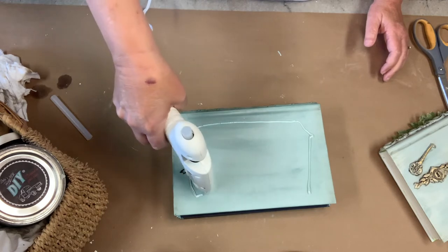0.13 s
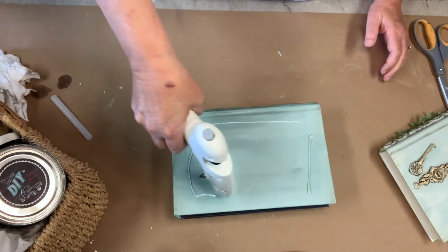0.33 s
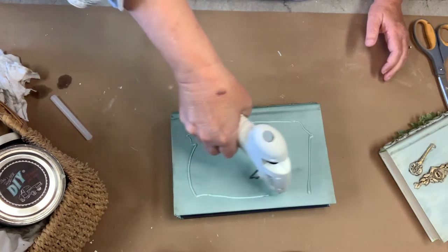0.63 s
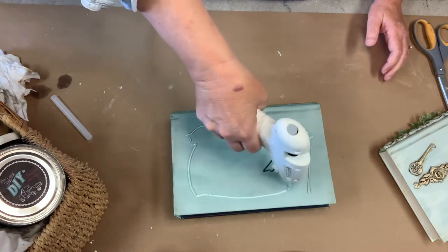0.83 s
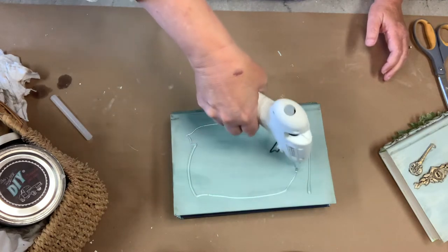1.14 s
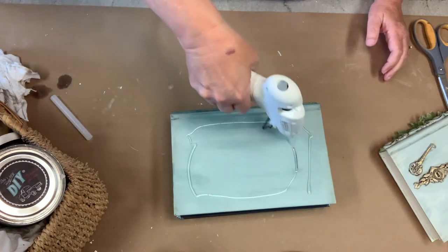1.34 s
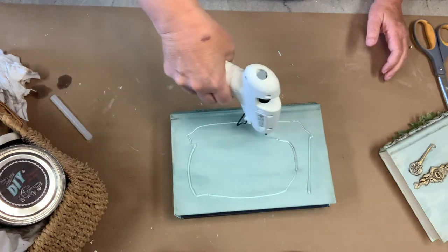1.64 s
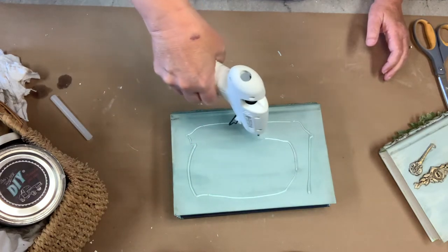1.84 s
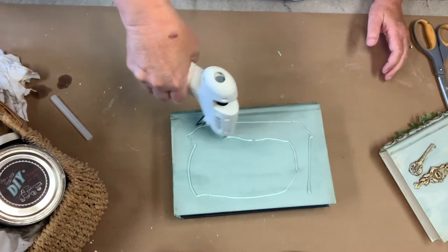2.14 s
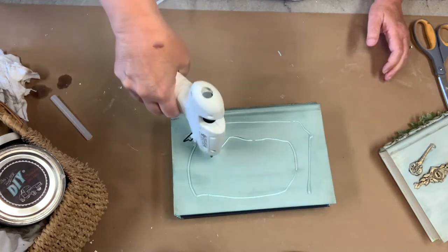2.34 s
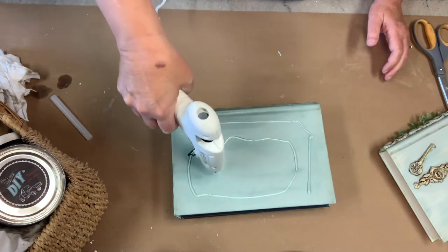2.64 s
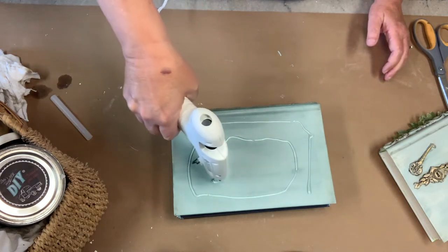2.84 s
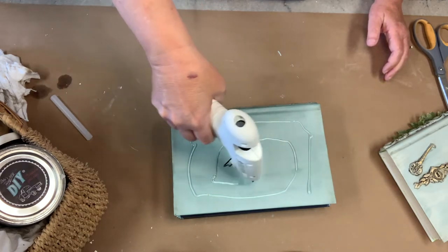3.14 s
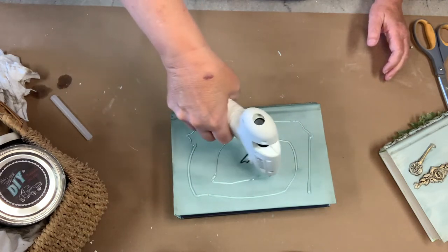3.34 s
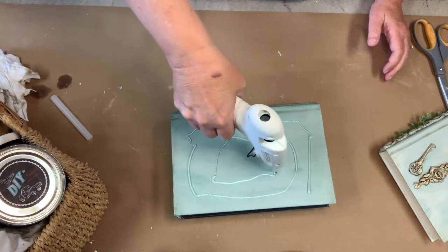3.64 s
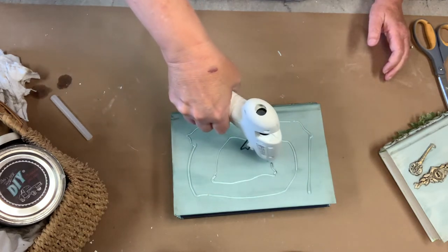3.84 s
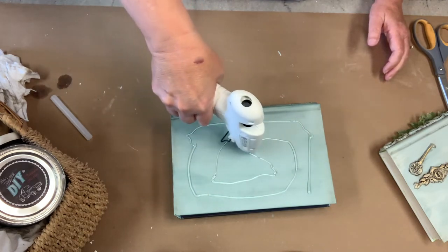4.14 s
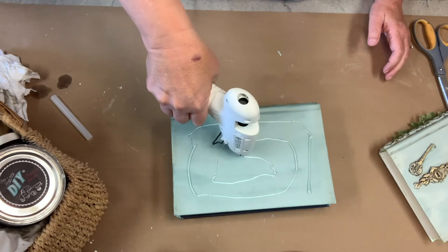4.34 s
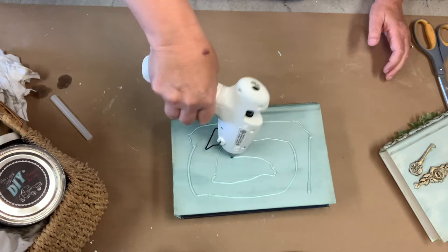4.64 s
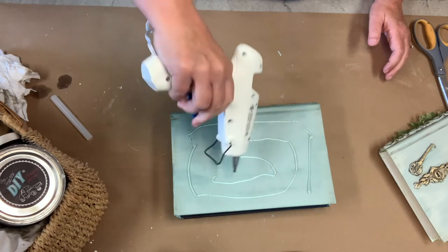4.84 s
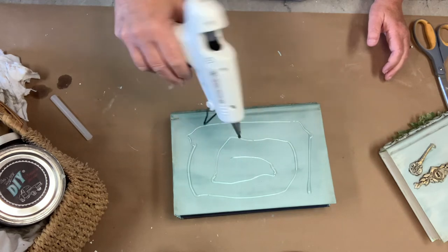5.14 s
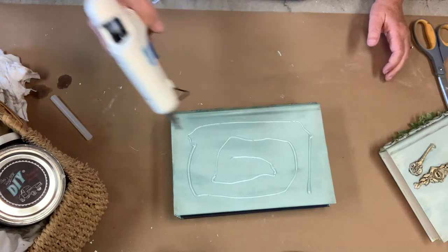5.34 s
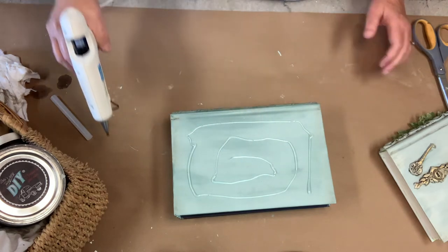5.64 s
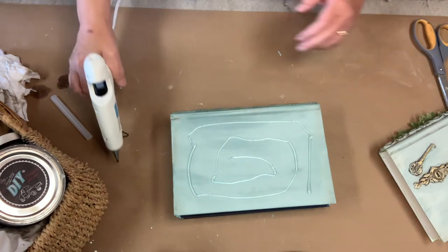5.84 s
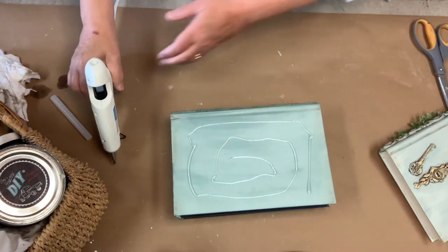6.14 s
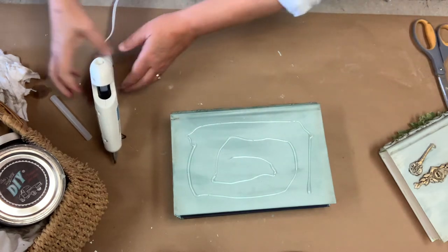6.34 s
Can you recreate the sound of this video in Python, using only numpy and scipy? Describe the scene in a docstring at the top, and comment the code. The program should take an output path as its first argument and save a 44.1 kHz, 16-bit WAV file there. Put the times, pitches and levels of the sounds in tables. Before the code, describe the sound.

A low, steady electrical hum with a slow waver and soft air noise runs throughout, in a small quiet room heard closely in stereo. Faint skin and sleeve rustles open the scene, with weak ticks from 0.1 to 0.6 seconds. Clearer hollow plastic trigger clicks with short dry creaks cluster at 0.7-0.9, 1.4-1.7, 2.2-2.5 and 3.0-3.3 seconds. More clicks, mostly without creaking, come at 3.7-4.0, a few scattered ones follow, and a last clicking, creaking burst runs from 4.6 to 4.8. Then mostly hum and light rustling. At about 5.87 the wire stand taps the table, and at 5.89 the grip strikes: a sharp, loud clack with a brief woody boom. The plastic rattles quickly, fading by 6.1, while the table ring is abruptly damped near 5.97 with a soft low bump. A slightly stronger rustle at 6.03 and tiny ticks finish over the hum.

```python
"""Quiet room, a plastic glue gun close to two microphone ports: hum at twice the mains frequency, air noise throughout.
The trigger ticks and creaks in bursts, each contact ringing the hollow shell; sleeve and skin rustle now and then.
Near six seconds the gun is set down: wire stand first, then the grip strikes, the table top booms, the gun rattles.
A soft bump and a few last ticks follow. Modes are damped sines, rubbing is random grains or slips, the walls add
a noise tail, and the ports hear everything a little out of step."""
import sys
import numpy as np
from scipy import signal
from scipy.fft import rfft, irfft, next_fast_len
from scipy.io import wavfile
from scipy.ndimage import uniform_filter1d, map_coordinates

SR = 44100
rng = np.random.default_rng(int(sys.argv[2]) if len(sys.argv) > 2 else 0)


def store_pcm(level_fs):
    """Save levels as 16-bit WAV."""
    pcm = np.round(np.clip(level_fs, -1, 1) * 32767).astype(np.int16)
    wavfile.write(sys.argv[1], SR, np.atleast_2d(pcm).T)


N = 286209  # samples

# Trigger contacts, close by: start_s, shell_peak_db, then hollow_db and grip_db over that peak, hardness_db
TICKS = [(0.139, -59, -9, -5, -15), (.232, -60.5, 9.5, -7, -12), (0.326, -52.5, -12, 3.5, -18),
         (.3744, -54.5, -2, 6.5, 6), (0.3873, -55.5, -9, 2, 23.5), (0.4677, -56, -14, 4.5, -7),
         (0.612, -53.5, 3, -18, -27), (.6964, -44.5, -5, -8, 12), (.6998, -38.5, 4, -29, -4),
         (0.7669, -40, -17, 0.5, 1), (0.7817, -41, -4, 1, 2.5), (0.7871, -47.5, -20, 3.5, -10),
         (0.7962, -38, -13, -16, -9), (0.801, -57, -9, -4, -2), (.8739, -40.5, -0.5, -22, -12),
         (0.9016, -46.5, 0.5, -6, -3), (1.3933, -45.5, 1.5, -16, -8), (1.4016, -39, -0.5, -20, 2.5),
         (1.4094, -53, -3, 7.5, 18), (1.499, -40.5, -16, -2, 9), (1.5079, -48.5, -3, 6, 3.5),
         (1.5138, -39, -5.5, -2, -0.5), (1.521, -46.5, -1, -6, -6), (1.577, -53, -20, -11, -19),
         (1.5836, -39.5, -28, -15.5, -39), (1.6234, -57, 6, -9, -6), (1.6734, -46, 0, 1, 8.5),
         (2.1745, -50.5, 8, -1, -7), (2.1824, -48, -6, 0, 15.5), (2.2649, -46.5, -10, 2, -8),
         (2.277, -49.5, -12, 1, -7), (2.2828, -39, -9, -5, -8.5), (2.296, -45.5, -10, -6, -18),
         (2.3221, -40, -10.5, 0, -7), (2.3275, -56, -13, 6.5, -2), (2.4876, -51, -8, 1.5, 7),
         (2.4987, -43.5, -5.5, 3, 4), (3.023, -53.5, 6.5, 5, -5), (3.0364, -58.5, 1, 11, 15),
         (3.1152, -39, -8, -5, 5.5), (3.1213, -51.5, -2, 10.5, -1), (3.1308, -40.5, -0.5, -9, 2),
         (3.1353, -50, -10, 6, -8), (3.145, -44.5, -10, -10, -23), (3.1548, -50, -14, -9, -14),
         (3.1668, -53, -13, 3, -8), (3.1756, -41.5, -11, -10, -26), (3.2, -66, -10, -2, -13),
         (3.21, -48, -11, -8, -12), (3.278, -47, -4, -16, 7.5), (3.288, -49, 2.5, 6, 3),
         (3.6602, -50, -13, 6, 1), (3.692, -47.5, -21, 2, -7), (3.7288, -45, -3, 1, 8.5),
         (3.771, -48, -19, 3.5, 0), (3.8036, -48, 1.5, 2, 15.5), (3.808, -41.5, -6, -3, 11.5),
         (3.8158, -51.5, -8, 7, 7), (3.8615, -53.5, -9, 0, 20), (3.8637, -40.5, -1, -0.5, 13.5),
         (3.8922, -54, -2, -4, 20), (3.895, -47, 2, 2, 12.5), (3.9746, -39.5, -0.5, -2.5, 15),
         (4.1269, -50.5, -2, 3, -30), (4.212, -42.5, 2.5, 6, 23), (4.422, -52, -12, 2.5, 4),
         (4.589, -44, -3.5, 1.5, 6.5), (4.6165, -46, -15, -13, -9), (4.625, -36.5, -15, -8, -11),
         (4.633, -46, -5, 4, -5.5), (4.641, -53, -6, -3, 20), (4.6477, -56, -10, -2, 1),
         (4.6564, -58, -9, 6, 14.5), (4.677, -63, -16, 8.5, -5), (4.7395, -49.5, -14, -15, 6),
         (4.753, -45.5, -18, -16, -2), (4.7625, -45.5, -9, -5, 0), (4.772, -52.5, -18, -4, -14),
         (4.789, -50, -24, -13, -12), (4.8044, -49.5, -15, -15, -21), (4.8105, -55, -21, -13, -14),
         (4.985, -60, -12, -2, 13), (6.0935, -55.5, -18, -4, 8.5), (6.236, -61.5, 14, -15, -11),
         (6.3377, -59, -12, -7, 19)]
# Ringing parts of the plastic gun: pitch_hz, width_hz, level_db
HOLLOW_MODES = [(704, 120, -6.5), (796, 74, 1.5)]
SHELL_MODES = [(1601, 156, -0.9)]
GRIP_MODES = [(2023, 150, 8), (2320, 180, -3.5)]
SNAP_MODES = [(3830, 274, 3.5), (4620, 373, 3.5), (5360, 500, 3.5), (6230, 580, 1.5)]
AIR_MODES = [(7340, 490, 4.5), (10200, 860, -6), (13500, 500, -11), (14800, 1900, -12.5)]
# Over the shell at hardness 0 dB; the snap follows hardness less than the air does
SNAP_DB, SNAP_DB_PER_HARDNESS_DB, AIR_DB = -5, 0.32, -16


def trigger_ticks():
    """Each contact excites five groups of shell modes; a harder one favours the high groups."""
    out = np.zeros((3, N))  # two versions to be blended into the ports, then what the walls get
    groups = (SHELL_MODES, HOLLOW_MODES, GRIP_MODES, SNAP_MODES, AIR_MODES)
    for start_s, shell_db, hollow_db, grip_db, hard_db in TICKS:
        snap_db = SNAP_DB + SNAP_DB_PER_HARDNESS_DB * hard_db
        over_db = np.array([0, hollow_db, grip_db, snap_db, AIR_DB + hard_db])
        add(out, start_s, strike(zip(groups, shell_db + over_db), seconds=.0005))
    return out


# Feed lever along the glue stick: start_s (of full force), hold_s, level_db, then scrape_db and bright_db over it
CREAKS = [(0.705, 0.0052, -56, -20, -13), (0.768, 0.019, -46.5, -19, -7.5), (0.892, 0.0093, -53.5, -5, -26),
          (0.908, 0.02, -62, -8, -19.5), (0.964, 0.053, -76, -2, 3.5), (1.426, 0.0057, -68.5, -10, -13),
          (1.496, 0.035, -60.5, -2, -0.5), (1.58, .01, -63.5, -27, -27), (1.652, 0.057, -62.5, -1.5, -13),
          (2.193, 0.027, -63.5, -8, -4.5), (2.257, 0.035, -54, -13, -8), (2.32, 0.021, -69.5, 15, -19),
          (2.386, 0.018, -79, 12, -19), (2.498, 0.014, -63, 3, -4.5), (3.036, 0.009, -57.5, -20, -7.5),
          (3.106, 0.035, -54, -25, -8), (3.2, 0.041, -63.5, -1, -26), (4.59, 0.0036, -58, -10, -12),
          (4.634, 0.017, -68, -18, 2.5), (4.729, 0.052, -54.5, -17, -13)]
# The lever rubbing: pitch_hz, width_hz, level_db
SCRAPE_MODES = [(2490, 220, 3.5), (2820, 200, -1), (3180, 260, -0.5), (3940, 240, -11.5)]
CREAK_RISE_DB_PER_S, CREAK_FALL_DB_PER_S = 699.5, 898
SLIPS_PER_S = 700  # on average


def lever_creak():
    """The lever sticks and slips: irregular slips of unequal size ring the shell while force holds."""
    force = swells([row[:3] for row in CREAKS], CREAK_RISE_DB_PER_S, CREAK_FALL_DB_PER_S)
    balance_db = [(0, scrape_db, bright_db) for *_, scrape_db, bright_db in CREAKS]
    dull_drive, scrape_drive, sharp_drive = amp(balance_db).T @ force
    slips = (rng.random((3, N)) < SLIPS_PER_S / SR) * amp(3 * rng.standard_normal((3, N)))
    dull = amp(2.5) * shell(SHELL_MODES) + amp(-5.5) * shell(HOLLOW_MODES) + amp(-7) * shell(GRIP_MODES[:1])
    scrape = amp(3.0) * shell(SCRAPE_MODES)
    sharp = amp(1.5) * shell(SNAP_MODES) + amp(-3.5) * shell(AIR_MODES)
    out = np.zeros((3, N))
    for drive, response in ((dull_drive, dull), (scrape_drive, scrape), (sharp_drive, sharp)):
        out += signal.fftconvolve(drive * slips, response, axes=1)[:, :N]
    return out


# The gun meets the table: start_s, clack_peak_db (before the gap in landing())
STAND = [(5.873, -31.5), (5.876, -34), (5.879, -42), (5.882, -29), (5.8845, -28.5), (5.887, -35)]  # the wire stand touches first
BLOW = [(5.8905, -11.5)]  # the grip strikes
RATTLE = [(5.897, -26), (5.902, -27.5), (5.908, -27), (5.913, -30), (5.921, -31), (5.93, -31.5),
          (5.945, -38.5), (5.958, -41.5), (5.972, -41.5), (5.99, -39.5), (6.008, -39.5), (6.03, -44.5),
          (6.045, -46.5), (6.065, -44.5), (6.1, -49)]  # the gun rattles to rest
# Each kind of contact: contacts, then knock_db, snap_db, air_db, table_db over its clack
LANDINGS = [(STAND, -1, -3, -17, -8), (BLOW, -6, -16, -11, -14.5), (RATTLE, 0, -6.5, -28.5, -14.5)]
# Gun against wood, a duller and a harder group: pitch_hz, width_hz, level_db
KNOCK_MODES = [(563, 175, -13.5), (913, 490, -2.5), (1130, 300, -10.5)]
CLACK_MODES = [(1690, 316, -5), (1930, 410, 2), (2275, 480, -0.5), (14000, 2000, -17)]
KNOCK_LAG_S = 0.001843  # the duller group speaks just after the clack


def gun_on_wood():
    """Short contacts ring the gun against the wood: a hard clack, then a duller knock."""
    out = np.zeros((3, N))
    for contacts, knock_db, snap_db, air_db, _ in LANDINGS:
        for start_s, db in contacts:
            hard = zip((CLACK_MODES, SNAP_MODES, AIR_MODES), (db, db + snap_db, db + air_db))
            dull = [(KNOCK_MODES, db + knock_db)]
            add(out, start_s, strike(hard, seconds=5e-5, clean=0.53, rise_cycles=4.0))
            add(out, start_s + KNOCK_LAG_S, strike(dull, seconds=1e-4, clean=0.84, rise_cycles=1.1))
    return out


# Table top: pitch_hz, width_hz, level_db
TABLE_MODES = [(194, 11, -7), (226.6, 5.5, -2.5), (302, 3.1, -3), (349.7, 7.9, -11.5), (510, 25, -9),
               (620, 37, -5.5)]
SETTLE_S, SETTLE_DB_PER_S = 5.968, 1300  # the gun's weight settles and stills the top
TABLE_FAR_DB = -8  # the walls get little of the top


def table_ring():
    """Every contact rings the table's narrow modes until the gun's weight damps them."""
    top = np.zeros((3, N))
    for contacts, *_, table_db in LANDINGS:
        for start_s, db in contacts:
            add(top, start_s, amp(db + table_db) * ring(TABLE_MODES, 0.42, rise_cycles=0.64, seconds=.5))
    stilled = amp(-SETTLE_DB_PER_S * np.maximum(np.arange(N) / SR - SETTLE_S, 0))
    return top * amp([[0], [0], [TABLE_FAR_DB]]) * stilled


# The table top gives under the stand: pitch_hz, width_hz, level_db
THUD_MODES = [(47.6, 6.6, -24.5), (265, 115, 5.5)]
THUD_S, THUD_DB = 5.8766, -11.5
# The soft bump as the top stills: pitch_hz, width_hz, level_db
BUMP_MODES = [(72, 18, -31.5)]
BUMP_LAG_S = .025  # after the weight settles


def table_thud():
    """The top gives as a low boom, then a softer bump as it stills."""
    out = np.zeros((3, N))
    add(out, THUD_S, amp(THUD_DB) * ring(THUD_MODES, 0.97, rise_cycles=1.26, seconds=.4))
    add(out, SETTLE_S + BUMP_LAG_S, ring(BUMP_MODES, 0.94, rise_cycles=2.2, seconds=.15))
    return out


SWEEP_FROM_HZ, SWEEP_TO_HZ, SWEEP_S = 2940, 793, 0.001075  # SWEEP_S: time constant of the glide
SWEEP_DB, SWEEP_HOLD_S, SWEEP_FALL_DB_PER_S = -13.5, 0.003, 9000


def bending_wave():
    """The blow runs through the top as a bending wave, high pitches first."""
    out = np.zeros((3, N))
    t = np.arange(SR // 50) / SR
    cycles = SWEEP_TO_HZ * t + (SWEEP_FROM_HZ - SWEEP_TO_HZ) * SWEEP_S * (1 - np.exp(-t / SWEEP_S))
    decay = amp(SWEEP_DB - SWEEP_FALL_DB_PER_S * np.maximum(t - SWEEP_HOLD_S, 0))
    onset = 1 - np.exp(-t / 0.00028)
    add(out, BLOW[0][0], decay * onset * -np.sin(2 * np.pi * cycles))
    return out


GAP_HZ, GAP_WIDTH_HZ, GAP_DB = 2830, 310, -3  # little sound leaves the landing gun between clack and snap


def landing():
    """Stand, then grip, meet the table: the gun clacks and the top booms, with a dip between clack and snap."""
    def gap(hz):
        off = (GAP_HZ ** 2 - hz ** 2) / GAP_WIDTH_HZ
        return (off + 1j * hz * amp(GAP_DB)) / (off + 1j * hz)
    return filtered(gun_on_wood() + table_ring() + table_thud() + bending_wave(), gap)


# Hand and sleeve moves: start_s (of full level), hold_s, level_db
RUSTLES = [(.01, 0.087, -66), (.215, 0.03, -66), (.33, .08, -91), (1.0, 0.024, -70.5), (1.21, 0.025, -66.5),
           (1.785, 0.03, -65.5), (2.666, 0.017, -69), (3.396, 0.018, -66.5), (4.99, .02, -73),
           (5.21, 0.041, -65.5), (5.56, 0.037, -67.5), (6.03, 0.067, -59.5), (6.23, 0.066, -66.5)]
# Tone of the rubbing: pitch_hz, level_db
CLOTH_TONE = [(500, -36), (1000, 0), (2200, -0.5), (4000, -8), (6500, -20), (12000, -32), (16000, -41)]
# Rustle, walls and air noise at the two ports: pitch_hz, left_right_likeness
FAR_LIKENESS = [(60, 0.94), (300, 1), (700, 0.011), (1300, 0.025), (2000, 0.39), (2800, 0.72),
                (5000, 0.054), (6300, 0.11), (7800, 0.59), (8500, 1), (11000, 1), (11600, 0.37),
                (13200, .55), (13800, 0.92)]
RUSTLE_RISE_DB_PER_S, RUSTLE_FALL_DB_PER_S, RUSTLE_REST_DB = 203, 111.5, -101


def rustle():
    """Skin and cloth rub in clumps of fine noise grains."""
    level = amp(RUSTLE_REST_DB) + sum(swells(RUSTLES, RUSTLE_RISE_DB_PER_S, RUSTLE_FALL_DB_PER_S))
    clumps = amp(1.5 * wobble(25) + 3 * wobble(150))
    grains = rng.standard_normal((2, N)) * clumps
    cloth = filtered(grains, lambda hz: amp(along(CLOTH_TONE, hz)))
    return blended(level * cloth / np.std(cloth), FAR_LIKENESS)


# What the walls get of the gun: pitch_hz, level_db
WALL_TONE = [(100, 1.5), (300, -8), (900, -7), (1600, -4), (2700, 5), (5000, 3.5), (8000, -5), (10000, -10),
             (14000, -6.5)]
# How long the room rings: pitch_hz, t60_s
ROOM_DECAY = [(100, 0.54), (500, 0.61), (2000, 0.31), (6000, 0.26), (14000, 0.19)]


def room(x):
    """Each frequency of the walls' answer dies at its own speed; the noise tail changes every fifth of a second."""
    x = filtered(x, lambda hz: amp(along(WALL_TONE, hz)))
    out, hop = np.zeros((2, N)), SR // 5
    for start in range(0, N, hop):
        noise = rng.standard_normal((2, SR * 3 // 4))
        hz, t, spectrum = signal.stft(noise, SR, nperseg=256)
        decay = amp(-60 * t / along(ROOM_DECAY, hz)[:, None])
        tail = signal.istft(spectrum * decay, SR, nperseg=256)[1]
        tail /= np.linalg.norm(tail[0])
        echo = signal.fftconvolve(x[None, start:start + hop], tail, axes=1)
        add(out, start / SR + .004, echo)  # the walls answer 4 ms late
    return blended(out, FAR_LIKENESS)


# Appliance tones: pitch_hz
HUM_HZ = [119.85, 239.7, 359.5, 118.0, 161.5]
# Mean level of each tone before its slow wavering: rms level_db
HUM_DB = [-60.5, -50, -68, -69, -72]
BEAT_DIP_S = .17  # a moment when the two tones near 120 Hz oppose


def hum():
    """Steady appliance hum near 120, 240 and 360 Hz, a faint 161.5 Hz tone, and a slow beat from a tone at 118 Hz."""
    t = np.arange(N) / SR - BEAT_DIP_S
    out = np.zeros(N)
    for sign, hz, db in zip((1, 1, 1, -1, 1), HUM_HZ, HUM_DB):
        level = np.sqrt(2) * amp(db + 0.36 * wobble(2.5))
        out += sign * level * np.sin(2 * np.pi * hz * t + 0.14 * wobble(0.9))
    return out


# Air noise of the quiet room before its wavering: pitch_hz, level_db (per Hz)
AIR_NOISE = [(20, -120), (35, -90), (50, -88), (70, -87), (100, -85.5), (160, -81.5), (220, -80),
             (330, -85), (520, -85), (800, -92), (2000, -99), (3300, -103), (4300, -109), (4800, -122),
             (5900, -120), (7000, -122), (13500, -127), (14200, -130), (14700, -150)]


def room_tone():
    """Air noise that wavers a little, in patches of time and pitch and as a whole."""
    air = filtered(rng.standard_normal((2, N)), lambda hz: amp(along(AIR_NOISE, hz)) * np.sqrt(SR / 2))
    spectrum = signal.stft(air, nperseg=512)[2]
    patches = rng.standard_normal(spectrum.shape[1:])
    patches = uniform_filter1d(patches, size=4, axis=0)
    patches = uniform_filter1d(patches, size=12, axis=1)
    air = signal.istft(spectrum * amp(1.5 * patches / patches.std()), nperseg=512)[1][:, :N]
    return blended(air * amp(0.8 * wobble(4.97)), FAR_LIKENESS)


DETUNE = .012  # relative spread of pitch; each contact holds the shell a little differently


def strike(groups, seconds, clean=0, rise_cycles=0.95):
    """A contact is a short run of slips, or a cleaner push; each (modes, peak dB) group rings to its own peak."""
    u = np.arange(1, round(5 * seconds * SR)) / (seconds * SR)
    slips = rng.standard_normal((3, len(u)))
    slips[0] = clean + (1 - abs(clean)) * slips[0]
    slips = slips * np.sqrt(u) * np.exp(-u)
    slips[2] = u == u[0]  # the walls smear the run: one slip stands for it
    pitch = 1 + rng.normal(0, DETUNE)
    out = 0
    for modes, db in groups:
        detuned = [(pitch * hz, width, level) for hz, width, level in modes]
        rung = signal.fftconvolve(slips, shell(detuned, rise_cycles), axes=1)
        # equal energy in all three, with the first version at the asked peak
        even = np.linalg.norm(rung[0]) / np.linalg.norm(rung, axis=1, keepdims=True)
        out = out + amp(db) * rung * even / np.abs(rung[0]).max()
    return out


def shell(modes, rise_cycles=0.97):
    """The ring close by, twice alike, and one blurred over all directions for the walls."""
    near = ring(modes, 1.5, rise_cycles)
    far = ring(modes, 1.2, rise_cycles, blur=0.24)
    return np.array([near, near, far * np.linalg.norm(near) / np.linalg.norm(far)])


def ring(modes, scatter_db, rise_cycles, seconds=.04, blur=0):
    """Damped modes at randomly scattered strengths, each building up before it dies; blur widens the high ones."""
    t = np.arange(round(seconds * SR)) / SR
    out = np.zeros(len(t))
    for hz, width, db in modes:
        width = width + blur * np.clip(hz - 1300, 0, 6000)
        envelope = np.exp(-np.pi * width * t) * (1 - np.exp(-t * hz / rise_cycles))
        out += amp(db + rng.normal(0, scatter_db)) * envelope * np.sin(2 * np.pi * hz * t)
    return out


def swells(rows, rise_db_per_s, fall_db_per_s):
    """A gain for each (start_s, hold_s, level_db) row that rises, holds and falls."""
    t = np.arange(N) / SR
    gains = []
    for start_s, hold_s, db in rows:
        rise = rise_db_per_s * np.maximum(start_s - t, 0)
        fall = fall_db_per_s * np.maximum(t - start_s - hold_s, 0)
        gains.append(amp(db - rise - fall))
    return gains


def blended(pair, likeness):
    """Left and right from two versions of a sound, as sum and difference a quarter turn apart."""
    def mix(hz):
        turn = np.arccos(np.clip(along(likeness, hz), 0, 1)) / 2
        return np.array([np.cos(turn), 1j * np.sin(turn)])
    mid, side = filtered(pair, mix)
    return np.array([mid + side, mid - side])


def filtered(x, response):
    """x shaped by a complex response of frequency."""
    m = next_fast_len(x.shape[-1] + 8192)
    return irfft(rfft(x, m) * response(np.fft.rfftfreq(m, 1 / SR)), m)[..., :x.shape[-1]]


def wobble(rate):
    """A smooth random curve, rate knots a second."""
    return map_coordinates(rng.standard_normal(int(N * rate / SR) + 4), [np.arange(N) * rate / SR])


def along(points, hz):
    """Value at hz between (pitch_hz, value) points on a log axis."""
    f, v = np.transpose(points)
    return np.interp(np.log(hz + 1), np.log(f + 1), v)


def amp(db):
    """dB to gain."""
    return 10 ** (np.asarray(db) / 20)


def add(track, start_s, sound):
    """Mix a sound into a track at a time."""
    part = track[:, round(start_s * SR):][:, :sound.shape[-1]]
    part += sound[..., :part.shape[1]]


# The nearby gun at the two ports: pitch_hz, left_right_likeness
NEAR_LIKENESS = [(500, 0.91), (2500, 0.86), (3600, 0.082), (6000, 0.1), (7300, 0.86), (15000, 0.58)]


def scene():
    """The gun close by, its answer from the walls, and the background."""
    handling, impact = trigger_ticks() + lever_creak(), landing()
    near = blended((handling + impact)[:2], NEAR_LIKENESS)
    walls = room(amp(-1.5) * handling[2] + amp(-1.2) * impact[2])
    return near + walls + rustle() + hum() + room_tone()


# Phase between the ports: pitch_hz, left_lag_rad
PORT_LAG = [(0, 0), (500, 0.99), (1400, 0.5), (3400, 3), (5800, -1), (7000, 2.7), (8500, 3.05),
            (11000, 3.35), (13800, 6), (16000, -6.5)]
# Level between the ports: pitch_hz, left_over_right_db
PORT_BALANCE = [(40, 0.5), (200, 2), (400, 2.5), (700, -0.1), (15000, 0.4)]
BASS_CUT_HZ, TOP_HZ = 40, 16400


def record(dry):
    """The ports differ in phase and bass level; the deepest bass rolls off; nothing is kept above the band limit."""
    def ports(hz):
        lag = np.interp(hz, *np.transpose(PORT_LAG))
        half = np.sqrt(amp(along(PORT_BALANCE, hz))) * np.exp(-.5j * lag)  # each port takes half the difference
        band = (1j * hz / (BASS_CUT_HZ + 1j * hz)) ** 2 * (hz < TOP_HZ)
        return np.array([half, 1 / half]) * band
    return filtered(dry, ports)


dry = scene()
out = record(dry)
store_pcm(out)
```